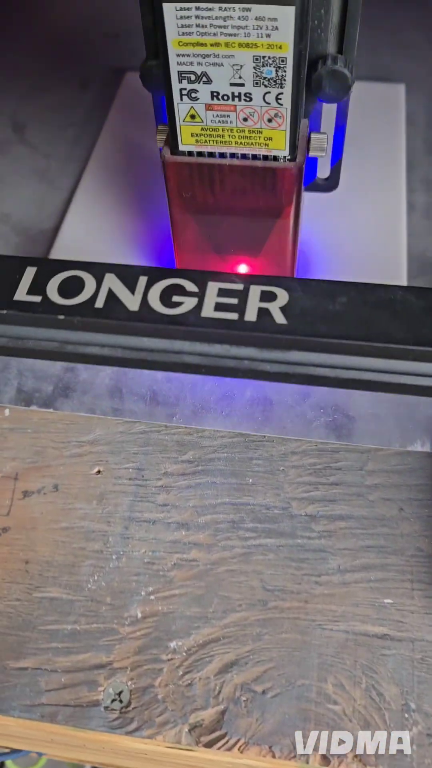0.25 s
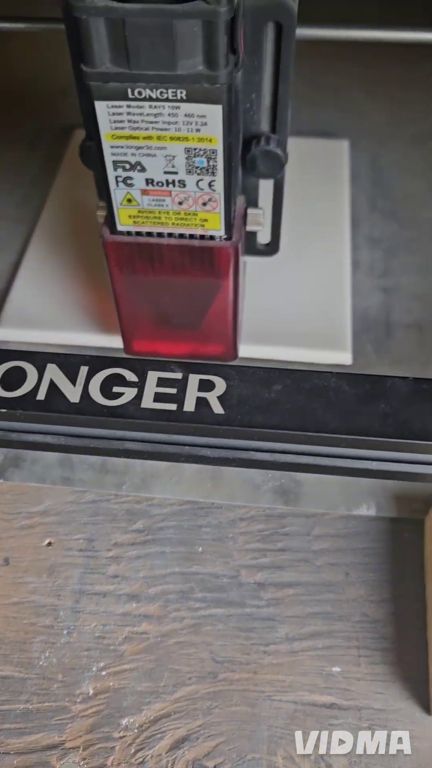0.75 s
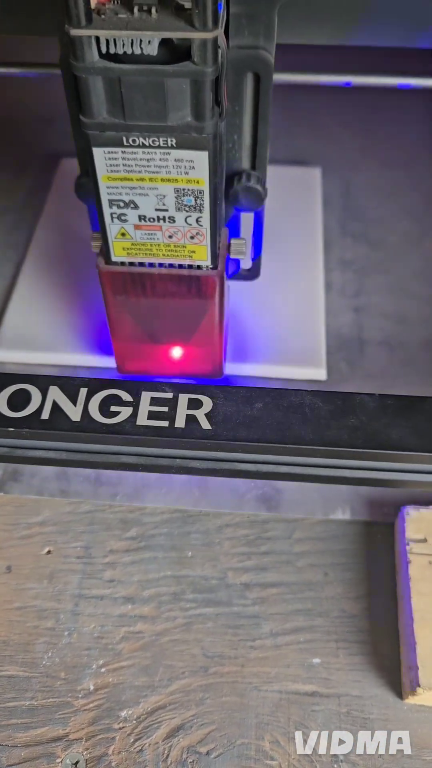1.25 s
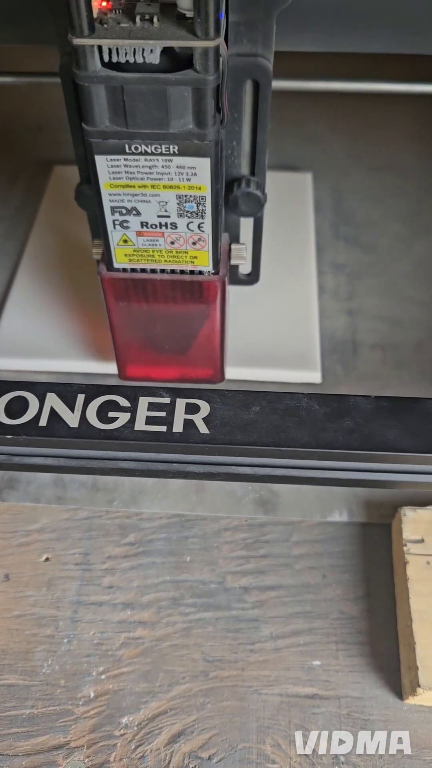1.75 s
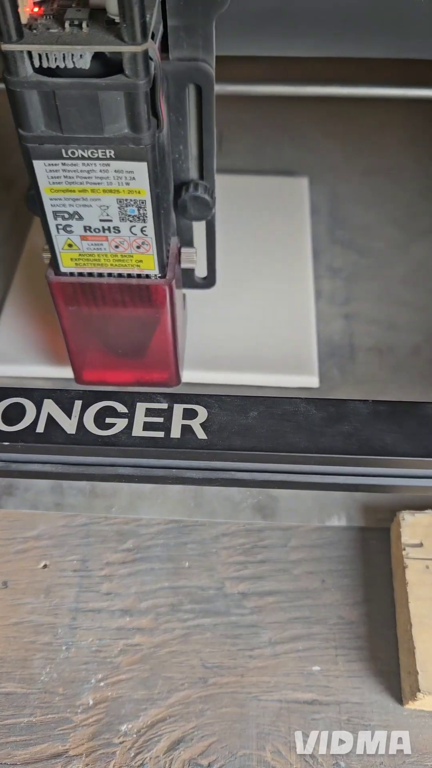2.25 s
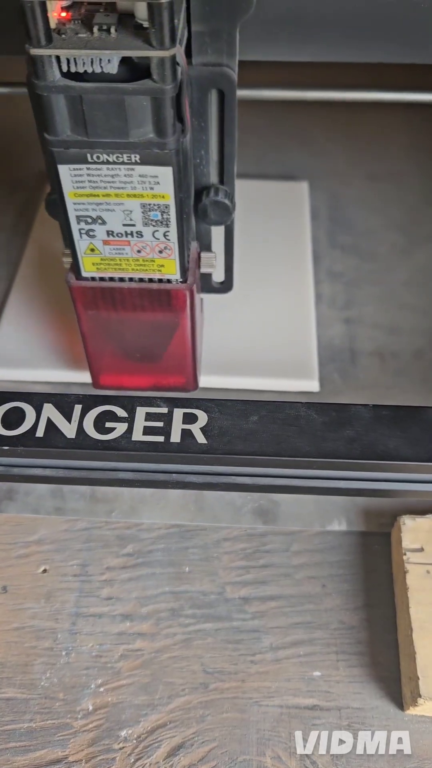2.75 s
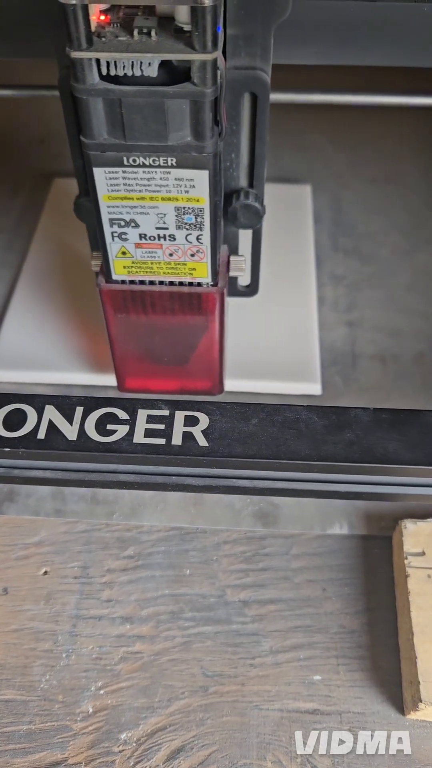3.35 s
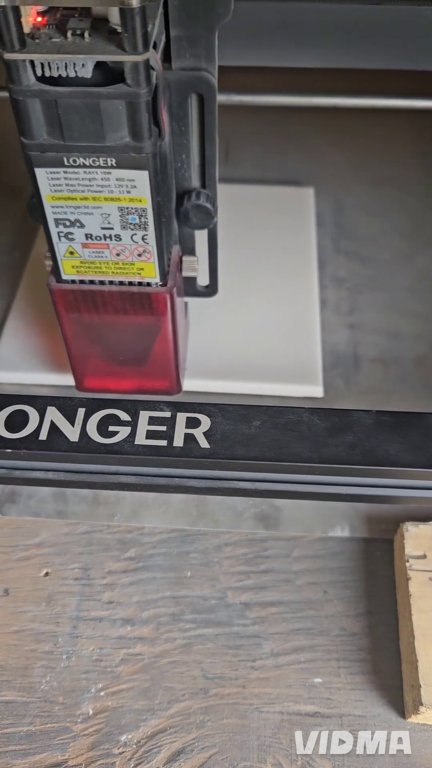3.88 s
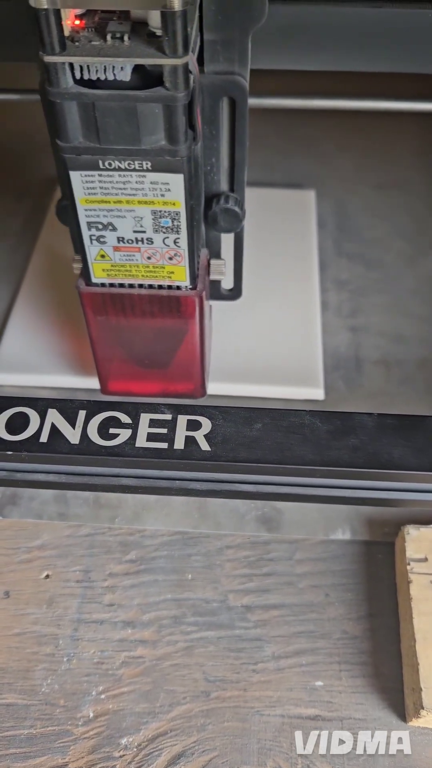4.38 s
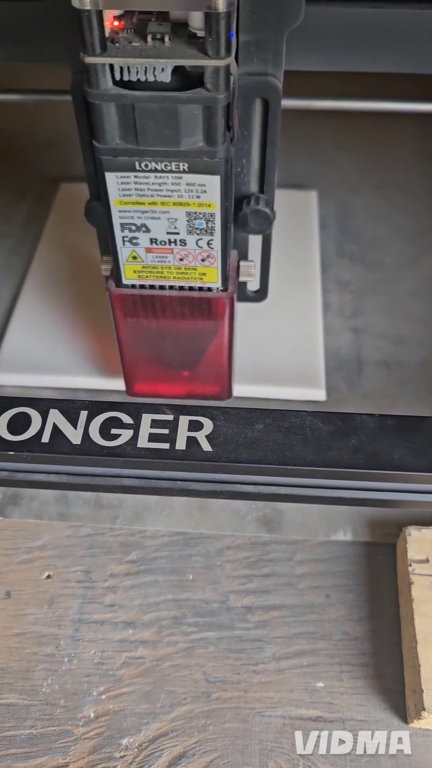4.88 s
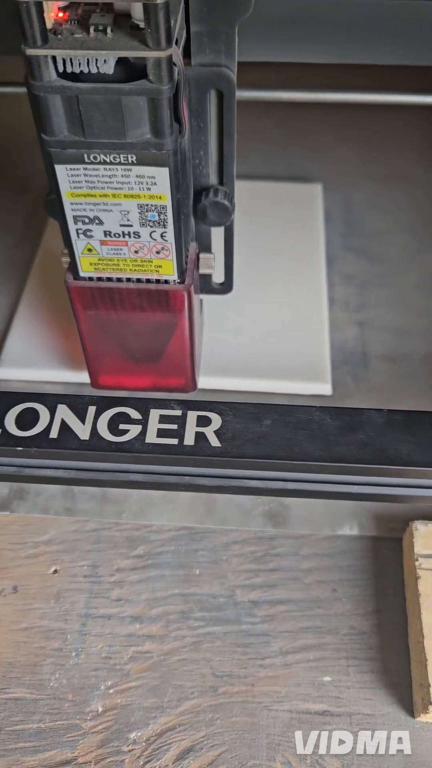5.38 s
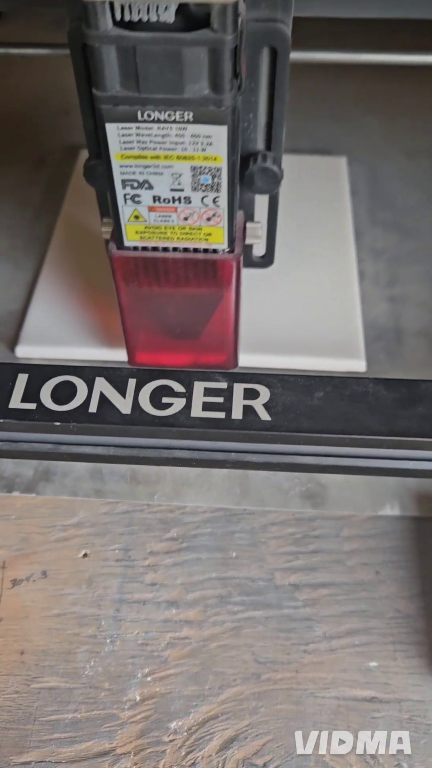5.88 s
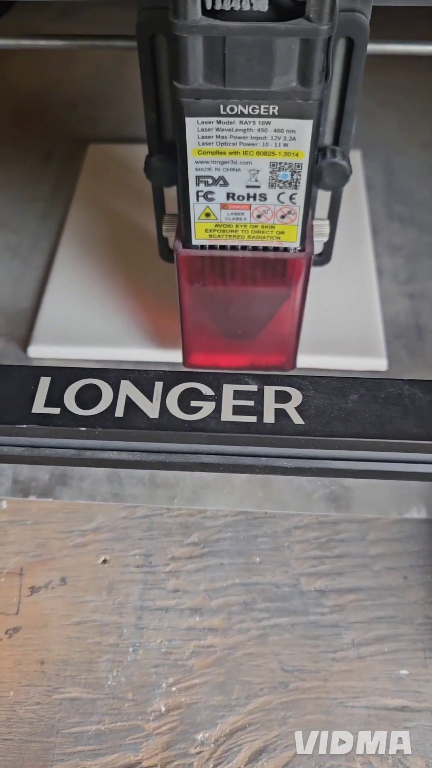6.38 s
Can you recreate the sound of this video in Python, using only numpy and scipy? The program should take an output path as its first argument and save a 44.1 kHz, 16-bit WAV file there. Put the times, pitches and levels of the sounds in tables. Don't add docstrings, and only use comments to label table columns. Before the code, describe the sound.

Steady airy fan noise and mains hum surround a motor that whines, dips and shakes the rails whenever the carriage turns. Short dry electric-sounding rasps mark the burning beam. A blunt woody thump lands early, followed by a faint high wheel squeal. Passes then lengthen, soft bird whistles appear behind, and low bench booms follow some late turns. Close stereo phone pickup, slightly stronger on the left, with very short reflections.

```python
import sys
import numpy as np
from scipy import signal
from scipy.fft import rfft, irfft
from scipy.io import wavfile
from scipy.ndimage import uniform_filter1d

SR = 44100
rng = np.random.default_rng(int(sys.argv[2]) if len(sys.argv) > 2 else 0)


def to_wav(sig):
    pcm = np.clip(np.atleast_2d(sig), -1, 1) * 32767
    pcm = np.round(pcm).astype(np.int16)
    wavfile.write(sys.argv[1], SR, pcm.T)


def boost(x):
    u = np.asarray(x, float) / 20
    return 10 ** u


N = 292383
TIME = np.arange(N) / SR
FREQ = np.arange(N // 2 + 1) * SR / N + 1e-3

# [t/s, frame shake/dB, row motor groan f/Hz]
TURNS = [(0.014, -29, 312), (0.25, -29, 410), (0.535, -29, 402), (0.824, -28.5, 530), (1.112, -35, 455),
         (1.389, -32, 459), (1.688, -26, 297), (2.465, -29.5, 430), (3.272, -26, 474), (4.06, -30.5, 417),
         (4.862, -28, 373), (5.635, -32, 472), (6.423, -28, 297)]
# [t/s, level/dB]
TURNED_AWAY = [
    (0, -5.5),
    (1.1, -3),
    (1.9, -0.5),
    (5.7, 0.5),
    (5.85, -6.5),
    (6.63, -4),
]


def along(table):
    return np.interp(TIME, *np.transpose(table))


def on_log(table):
    hz, value = np.transpose(table)
    return np.interp(np.log(FREQ), np.log(hz), value)


def level(x, db):
    return x * boost(db) / np.sqrt(np.mean(x ** 2))


def walk(rate):
    knots = np.repeat(rng.standard_normal(int(rate * N / SR) + 2), 4)
    knots = uniform_filter1d(knots, size=4)
    return 1.2 * np.interp(TIME * rate * 4, np.arange(len(knots)), knots)


def tone(hz):
    return np.sqrt(2) * np.sin(2 * np.pi * np.cumsum(hz) / SR)


def ring(x, modes):
    out = 0
    for k, (hz, width, db) in enumerate(modes):
        b, a = signal.iirpeak(hz, hz / width, fs=SR)
        out = out + (-1) ** k * boost(db) * signal.lfilter(b, a, x)
    return out


def gate(rows, edge_s):
    corners = []
    for s, d, db in rows:
        corners += [(s, 0), (s + edge_s, boost(db)), (s + d, boost(db)), (s + d + edge_s, 0)]
    return along(corners)


def ticks(hz, jitter, scatter_db):
    chance = rng.standard_normal((int(1.2 * hz * N / SR), 2))
    at = (np.cumsum(1 + jitter * chance[:, 0]) * SR / hz).astype(int)
    out = np.zeros(N)
    out[at[at < N]] = boost(scatter_db * chance[at < N, 1])
    return out


def beam():
    # [t/s, length/s, crackle level/dB, buzz level/dB, flare level/dB]
    burns = [(.030, .014, -51, -46, -41), (.163, .028, -46.5, -37, -38), (.308, .028, -50, -41, -39),
             (.453, .014, -46, -44, -41), (.588, .022, -44, -41, -40), (.723, .033, -47, -38.5, -39),
             (.872, .035, -48, -39, -39), (1.018, .017, -51.5, -45, -39), (1.157, .018, -42.5, -39, -43),
             (1.285, .036, -45, -39, -40), (1.434, .036, -43, -38, -41), (1.575, .028, -45.5, -38, -37),
             (1.727, .024, -44, -37.5, -40), (1.850, .036, -43, -36.5, -39), (2.386, .025, -57, -50, -48),
             (2.512, .018, -51, -46, -40), (3.025, .036, -45.5, -37.5, -38), (3.158, .032, -44.5, -39, -39),
             (3.318, .031, -43, -37, -40), (3.442, .033, -44.5, -37, -38), (3.980, .015, -47, -36, -36),
             (4.105, .013, -44, -43, -39), (4.617, .045, -44, -38, -38), (4.748, .036, -46, -39, -39),
             (4.897, .036, -45, -40, -38), (5.015, .031, -43.5, -36.5, -40), (5.053, .015, -41, -35, -37),
             (5.553, .022, -46, -38, -37), (5.685, .016, -46, -44, -39), (6.190, .019, -50, -38, -40),
             (6.216, .026, -51, -39, -43), (6.322, .032, -49.5, -37.5, -39), (6.475, .036, -48, -38, -40),
             (6.597, .03, -50, -40, -41)]
    # [f/Hz, width/Hz, level/dB]
    tile = [(960, 260, -6.5), (1450, 500, -8), (2003, 90, 0), (2300, 350, -4.5), (2880, 250, -3.5),
            (3500, 600, -15), (4150, 500, -17), (4700, 600, -5.5)]
    # [f/Hz, width/Hz, level/dB]
    shroud = [(6100, 900, 2), (7250, 800, 6.5), (8150, 500, 9), (9150, 300, 4), (9900, 600, 4),
              (10900, 500, 0), (11800, 600, 5), (12600, 1400, 2), (13000, 800, -5), (14300, 2100, 0)]
    # [f/Hz, width/Hz, level/dB]
    hollow = [(880, 160, 1), (1030, 200, 1), (1420, 350, 0), (2350, 500, -6), (4900, 700, -13)]
    chop_hz, spit_lag_s = 1002, .0005

    flashes = ticks(chop_hz, .012, 2.5) * boost(1.5 * walk(150))
    spit = rng.standard_normal((2, N)) * boost(2.0 * walk(200))
    rasp = level(flashes, 0) + level(spit[0], 0)
    buzz = level(ring(rasp, tile), -6.5)
    puff = .5 + level(signal.lfilter([1], [1, -.9], flashes), -31.0)
    crackle = level(ring(puff * spit[1], shroud), 0)

    enter = gate([(s - .001, .009, flare) for s, _, _, _, flare in burns], .0008)
    leave = gate([(s + d - .008, .009, flare - 5) for s, d, _, _, flare in burns], .003)
    pops = level(ring(rasp + spit[0], hollow), -1.5) * (enter + leave)
    lit = gate([(s, d - .002, db + .5) for s, d, _, db, _ in burns], .004)
    grit = gate([(s + spit_lag_s, d - 4 * spit_lag_s, db - 2.5) for s, d, db, *_ in burns], .0045)
    return pops + buzz * lit + crackle * grit


def motor():
    # [multiple of the coil cycle, level/dB rms]
    orders = [(1, -50), (2, -55), (3, -62), (4, -60), (14, -66), (16, -58.5), (31, -70), (32, -57),
              (33, -58.5), (34, -76), (40, -76), (45, -77), (46, -78), (47, -78), (48, -75), (50, -80)]
    # [t/s, level/dB]
    closeness = [
        (0, -25),
        (.3, -7),
        (1.8, -4.5),
        (2.5, -2.5),
        (4.6, -2.5),
        (5.9, -3),
        (6.63, -5.5),
    ]
    # [f/Hz, time from the turn/s, half length/s, level/dB]
    housing = (5790, .041, .007, -55)
    ramp_s, step_hz = .068, 174.96

    from_turn = [np.abs(TIME - s) for s, *_ in TURNS]
    speed = np.min([np.clip(away / ramp_s, 0, 1) for away in from_turn], axis=0)
    turn = 2 * np.pi * np.cumsum(step_hz * speed) / SR
    near_db = along(closeness)

    hz, lag_s, half_s, ring_db = housing
    passing = sum(np.exp(-((away - lag_s) / half_s) ** 2) for away in from_turn)
    out = boost(ring_db + near_db + 4.3 * walk(11)) * passing * np.sin(2 * np.pi * hz * TIME)
    for k, db in orders:
        strength = boost(db + near_db * (k > 20) + 2.0 * walk(25))
        fade = speed ** (0.4 + 0.14 * k)
        out = out + strength * fade * np.sqrt(2) * np.sin(k * turn + k * k)
    return out


def frame():
    # [f/Hz, width/Hz, level/dB]
    rails = [(104.7, 32.4, 1.5), (143, 27, 1.5), (202, 46, -3), (315, 54, -5.5), (439, 35, -4.5),
             (538, 38, -6), (684, 73, -10.5), (930, 200, -13)]
    cog_hz, long_pass_s = 103.8, .6

    jolts = level(ticks(cog_hz, .15, 2.5), 0) + .45 * rng.standard_normal(N)
    rubber_belts = signal.butter(2, 620, fs=SR, output="sos")
    soft = signal.sosfilt(rubber_belts, jolts)
    push, groan = 0, 0
    passes = np.diff([s for s, *_ in TURNS], prepend=0, append=N / SR)
    longest = np.maximum(passes[:-1], passes[1:])
    for (s, db, hz), pass_s in zip(TURNS, longest):
        half_s, groan_db = (.052, -42) if pass_s > long_pass_s else (.034, -35)
        u = np.clip((TIME - s) / half_s, -1, 1)
        swell = np.cos(np.pi / 2 * u)
        push = push + boost(db - 11) * swell
        rising = np.sin(2 * np.pi * hz * half_s * (u + 0.046 * u ** 2))
        groan = groan + boost(groan_db) * swell ** 2 * rising
    return ring(push * soft, rails) * boost(26.5) + groan * boost(-1 + 3.5 * walk(70))


def knock():
    # [t/s, peak level/dB]
    blow = (1.148, -12.5)
    # [f/Hz, level/dB, t60/s]
    wood = [(103, -11, 0.32), (144.3, 1.5, 0.18), (223, -0.5, 0.17), (335, 3.5, 0.1), (424, -3, 0.053),
            (533, 1.5, 0.037), (690, -8, 0.041), (1240, -3.5, 0.02)]
    start_s, peak_db = blow
    t = np.clip(TIME - start_s, 0, None)
    body = 0
    for hz, db, t60 in wood:
        body = body + boost(db) * np.exp(-np.log(1000) * t / t60) * np.sin(2 * np.pi * hz * t)
    return boost(peak_db) * body / np.max(np.abs(body))


def squeal():
    # [t/s, length/s, f/Hz, level/dB]
    slip = (1.4, 0.27, 11398, -61)
    s, d, hz, db = slip
    whistle = ring(rng.standard_normal(N), [(hz, 40, 0)])
    return level(whistle, 0) * gate([(s, d, db)], 0.015)


def sway():
    # [t/s, length/s, f/Hz, level/dB]
    booms = [
        (4.04, .16, 97, -36),
        (5.6, .13, 95, -37),
        (6.45, .12, 85, -35),
    ]
    out = 0
    for s, d, hz, db in booms:
        out = out + gate([(s, d, db)], .03) * tone(hz + 6.0 * walk(30)) * boost(3.0 * walk(25))
    return out


def fan():
    # [t/s, fifth blade multiple f/Hz]
    fan_speed = [(0, 2905), (.55, 2903), (.9, 2892), (1.9, 2892), (2.3, 2919), (2.95, 2927), (3.5, 2892),
                 (3.85, 2918), (4.55, 2924), (4.8, 2896), (5.15, 2887), (5.4, 2913), (6.15, 2923),
                 (6.4, 2892), (6.63, 2888)]
    # [multiple of the blade rate, level/dB rms]
    multiples = [(1, -66.5), (2, -53.5), (3, -66), (4, -68), (5, -57.5), (6, -67), (7, -63.5), (8, -60.5)]
    blade_hz = along(fan_speed) / 5 + 1.6 * walk(30)
    turn = 2 * np.pi * np.cumsum(blade_hz) / SR
    away_db = along(TURNED_AWAY)
    out = 0
    for k, db in multiples:
        strength = boost(db + away_db * (k > 4) + 4.03 * walk(30))
        out = out + strength * np.sqrt(2) * np.sin(k * turn + k)
    return out


def blade_rush():
    # [f/Hz, width/Hz, level/dB]
    blurred = [(440, 50, 4), (895, 45, -1), (1040, 50, 0), (1720, 120, -4), (1448, 40, -5), (3860, 50, -11),
               (528, 30, 0), (6400, 80, -18), (7400, 120, -13), (8400, 100, -17), (11250, 200, -24)]
    return level(ring(rng.standard_normal(N), blurred), -54)


def ports(near, far_left, far_right, share):
    # [f/Hz, phase/rad]
    lead = [(0, 0), (950, 1.1), (1890, 5.9), (2410, 6.5), (2930, 10.5), (3880, 13.2), (5600, 18.7),
            (5860, 18.5), (9040, 27.7), (9990, 29.1), (10200, 30.5), (11200, 28.7), (14000, 31.1),
            (15200, 41.2)]
    # [f/Hz, level/dB]
    lean = [(60, 2.5), (110, 3.0), (200, 3.5), (380, 3.5), (700, 6.0), (1290, 5.5), (2380, 3.5),
            (4400, 4.0), (8120, 10.5), (15000, 8.0)]
    late = np.exp(-1j * np.interp(FREQ, *np.transpose(lead)))
    common, apart = np.sqrt(share), np.sqrt(1 - share)
    left = common * near + apart * far_left
    right = common * near * late + apart * far_right
    half_db = on_log(lean) / 2
    return np.array([left * boost(half_db), right * boost(-half_db)])


def air(alike):
    # [f/Hz, level/dB per Hz]
    rush = [(20, -9), (45, -8), (90, -2), (150, -14.5), (300, -19), (700, -21), (1700, -14.5),
            (2600, -26.5), (4200, -26), (6600, -35), (8500, -38), (11000, -46.5), (15200, -47),
            (15600, -70)]
    # [f/Hz, width/Hz, left level/dB, right level/dB]
    hollows = [(826, 20, -4.5, -16), (1002, 17, -21, 3), (1250, 56, -5.5, 6), (1555, 285, -1.5, -11.5),
               (1950, 240, -2.5, 1), (2565, 195, -7, 5), (2815, 275, 6.5, -6.5), (3434, 74, -7, -17),
               (3550, 86, 0, 2), (4130, 130, 1, -2), (4500, 150, -4, 1)]
    colour = ports(*rfft(rng.standard_normal((3, N))), alike) * boost(on_log(rush))
    echo_db = 0
    for hz, width, *db in hollows:
        echo_db = echo_db + np.outer(db, np.exp(-((FREQ - hz) / width) ** 2))
    colour = colour * boost(echo_db)
    away_db = along(TURNED_AWAY)
    out, shared = 0, walk(8.8)
    for octave in np.arange(4.5, 14.5, .5):
        window = np.clip(1 - 2 * np.abs(np.log2(FREQ) - octave), 0, 1)
        band = irfft(colour * window, N)
        tilt = np.clip((octave - 9.5) / 3.0, 0, 1)
        out = out + band * boost(tilt * away_db + .6 * shared + 1.0 * walk(14))
    return level(out, -42)


def hum():
    # [f/Hz, level/dB rms, wobble/Hz]
    steady = [(60.3, -54, 2.51), (86.1, -43, 3.85), (116.75, -46.5, 2.99), (247.2, -53.5, 3)]
    return sum(boost(db + 3.1 * walk(14)) * tone(hz + wobble * walk(15)) for hz, db, wobble in steady)


def bird():
    # [t/s, length/s, start f/Hz, end f/Hz, octave level/dB]
    notes_sung = [
        (3.572, .118, 2635, 2505, -51),
        (3.69, .025, 2380, 2330, -55),
        (3.70, .04, 2110, 1950, -54),
        (3.765, .035, 1990, 1900, -55),
        (3.875, .05, 1540, 1420, -54),
        (4.852, .036, 2600, 2590, -55),
        (4.96, .025, 1830, 1810, -54),
        (4.99, .02, 1850, 1830, -54),
        (5.085, .03, 1760, 1720, -56),
    ]
    low_db, tip_db, waver_hz = -6, 9, 18
    out, rasp = np.zeros(N), boost(3.0 * walk(90))
    for s, d, hz0, hz1, db in notes_sung:
        u = np.arange(int(d * SR)) / (d * SR)
        waver = waver_hz * np.sin(2 * np.pi * 45 * d * u)
        phase = 2 * np.pi * np.cumsum(hz0 + (hz1 - hz0) * u ** 2 + waver) / SR
        lower = boost(db + low_db + tip_db * u) * np.sin(phase)
        octave = boost(db - tip_db * u ** 2) * np.sin(2 * phase)
        start = int(s * SR)
        out[start:start + len(u)] += 2.0 * np.sqrt(np.sin(np.pi * u)) * (lower + octave)
    return out * rasp


def room():
    t60_s, even_hz = 0.04, 200
    t = np.arange(int(t60_s * SR)) / SR
    tails = rng.standard_normal((2, len(t))) * np.exp(-np.log(1000) * t / t60_s)
    echo = rfft(tails, N)
    power = uniform_filter1d(np.abs(echo) ** 2, size=int(even_hz * N / SR), axis=1)
    return echo * boost(1.0) / np.sqrt(power)


def scene():
    # [f/Hz, share/0-1]
    likeness = [(60, 0.93), (130, 1), (300, 0), (700, 0.66), (1500, 0.29), (3000, 0.08), (7000, 0.23),
                (15000, 0.33)]
    alike = np.clip(on_log(likeness), 0, 1)
    echoed = rfft(beam() + knock() + squeal() + blade_rush())
    direct = rfft(motor() + frame() + sway() + fan() + hum() + bird())
    heard = ports(echoed, *(echoed * room()), alike) + ports(direct, 0, 0, 0.5)
    return irfft(heard, N) + air(alike)


def low_pass(x):
    return signal.sosfilt(signal.butter(12, 15710, fs=SR, output="sos"), x)


def record(dry):
    # [f/Hz, level/dB]
    port_dip = [(8900, 4.5), (9030, -14), (10250, -15), (10500, -0.5)]
    faint_db, spread_db, faint_hz, top_hz = -91, 6.0, 8900, 15600
    hz, t, cells = signal.stft(dry, SR, nperseg=1024)
    cells = cells * boost(np.interp(hz, *np.transpose(port_dip)))[:, None]
    hz = hz[:, None]
    strength = np.sqrt(uniform_filter1d(np.abs(cells) ** 2, size=8, axis=1))

    patches = rng.standard_normal((len(hz) // 8 + 1, len(t) // 4 + 1))
    patches = np.kron(patches, np.ones((8, 4)))[:len(hz), :len(t)]
    threshold = boost(faint_db - 3 * (hz > port_dip[-1][0]) + spread_db * patches)
    keep = np.clip(2 * strength / threshold - 1, .05, 1) ** 2
    keep = np.where(hz < faint_hz, 1, keep) * (hz < top_hz)
    mix = signal.istft(cells * keep, SR, nperseg=1024)[1][:, :N]
    return low_pass(mix)


dry = scene()
out = record(dry)
to_wav(out)
```